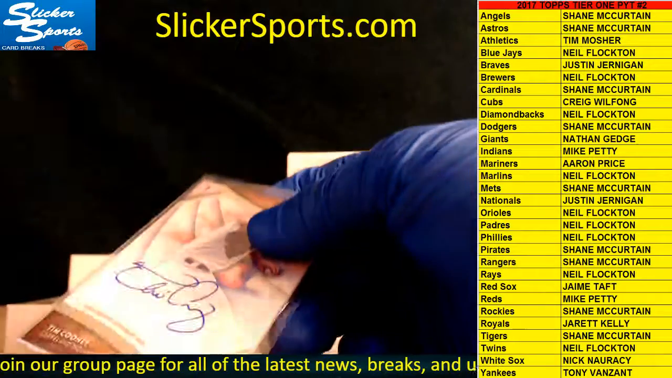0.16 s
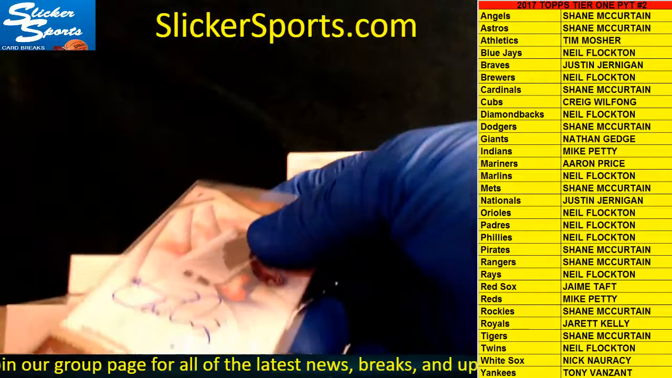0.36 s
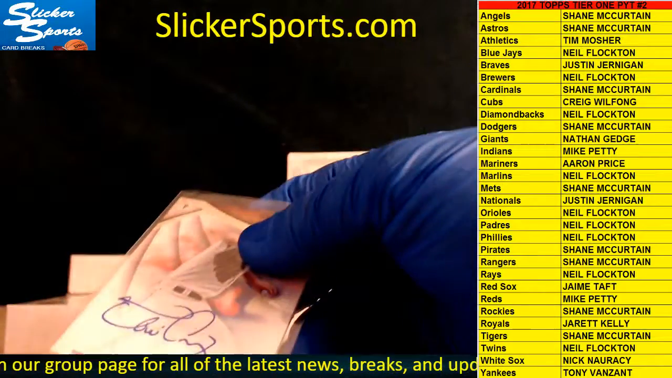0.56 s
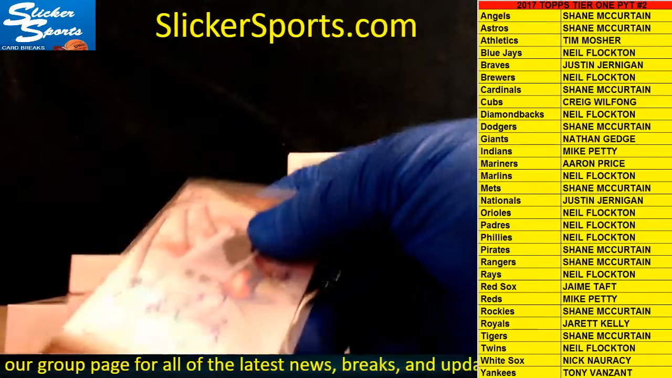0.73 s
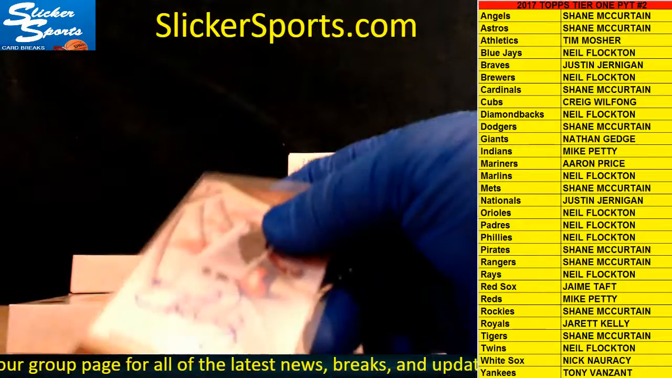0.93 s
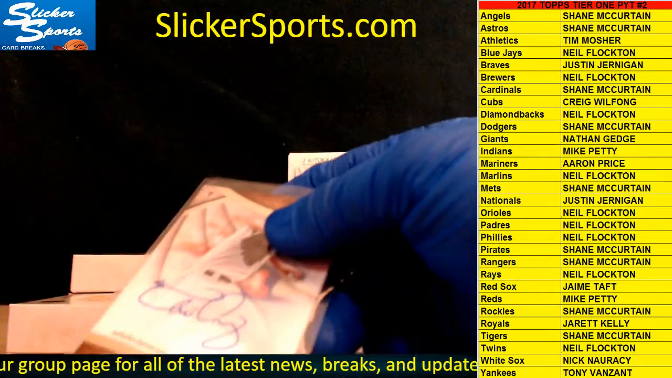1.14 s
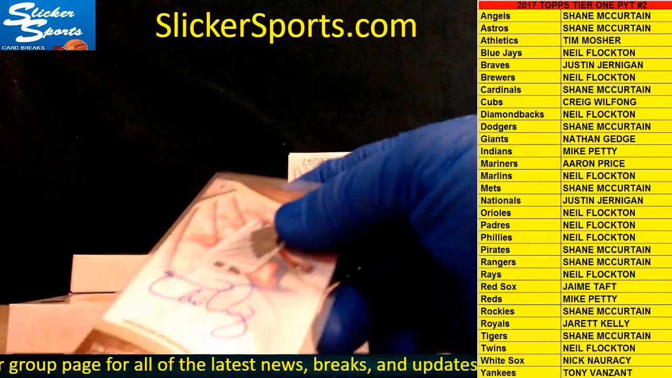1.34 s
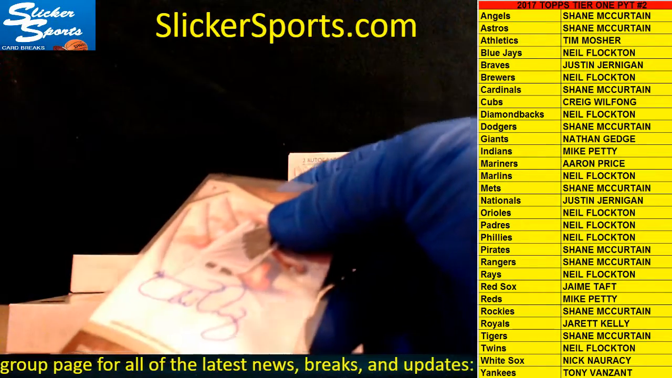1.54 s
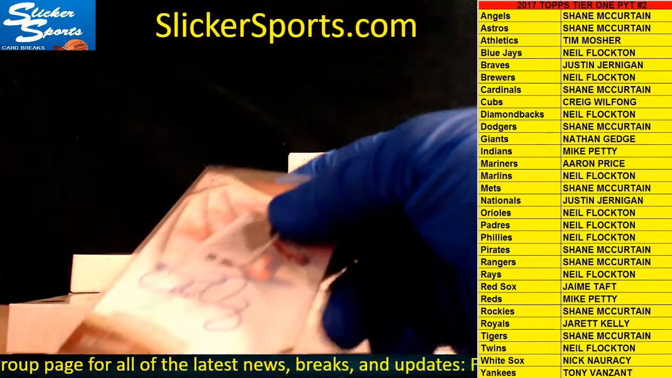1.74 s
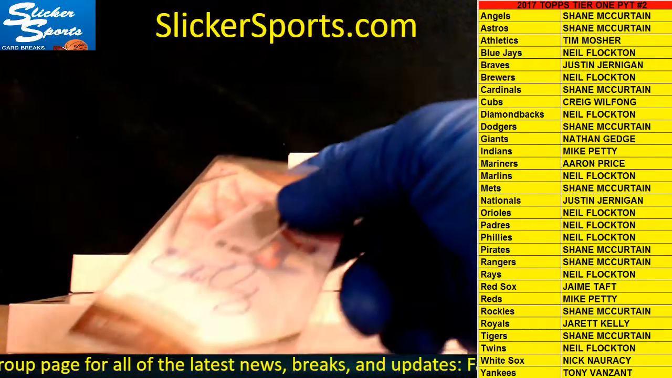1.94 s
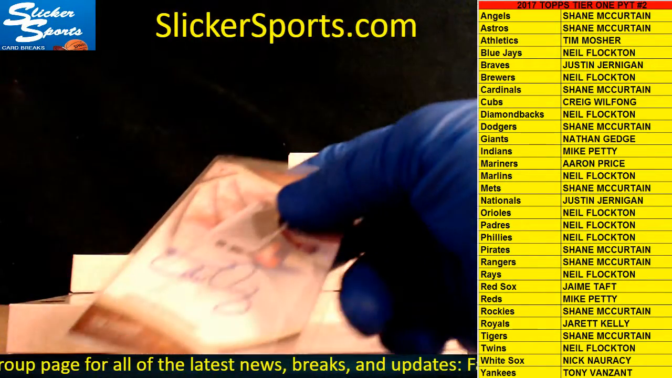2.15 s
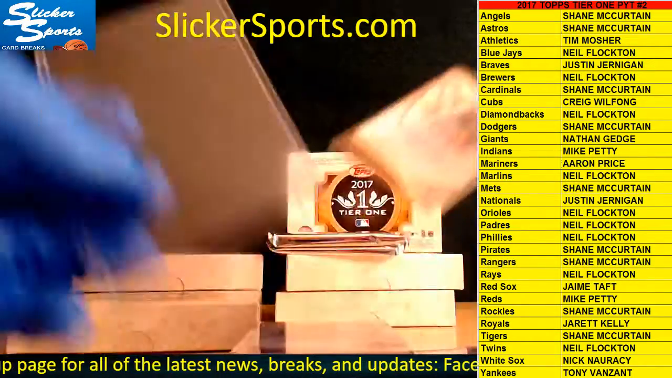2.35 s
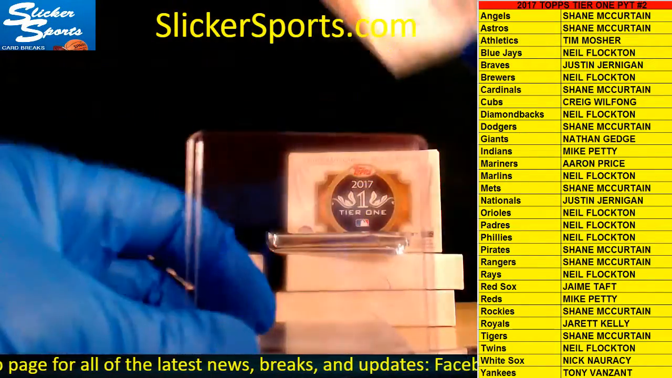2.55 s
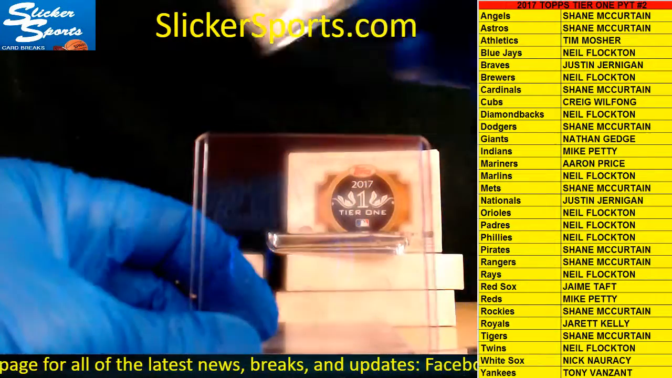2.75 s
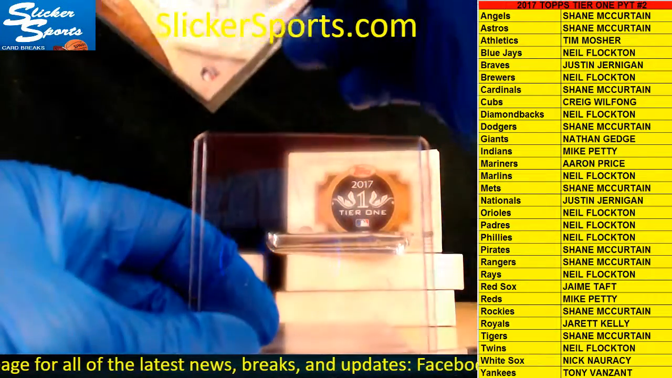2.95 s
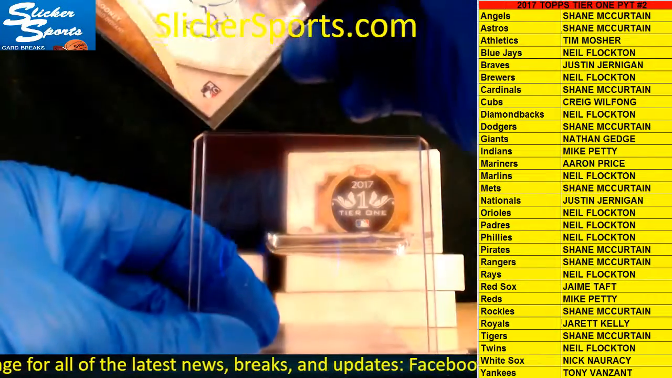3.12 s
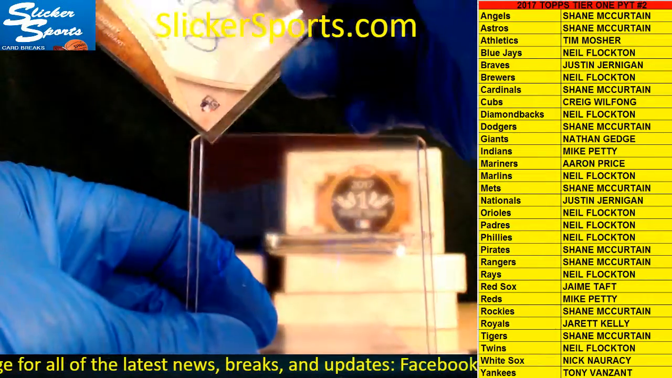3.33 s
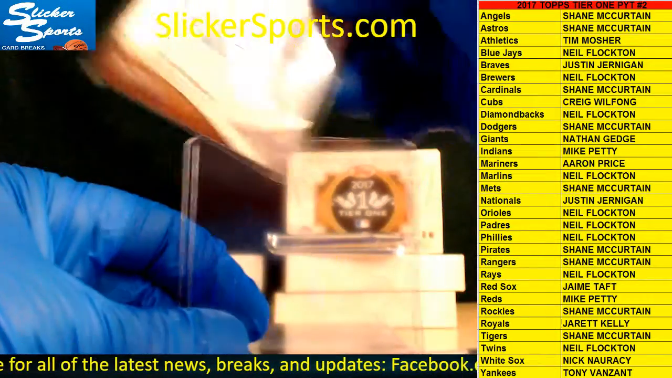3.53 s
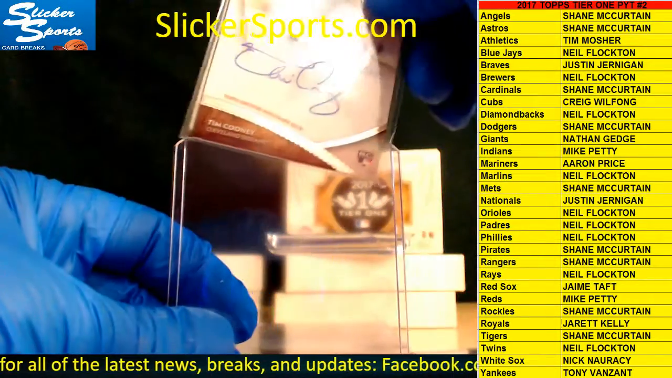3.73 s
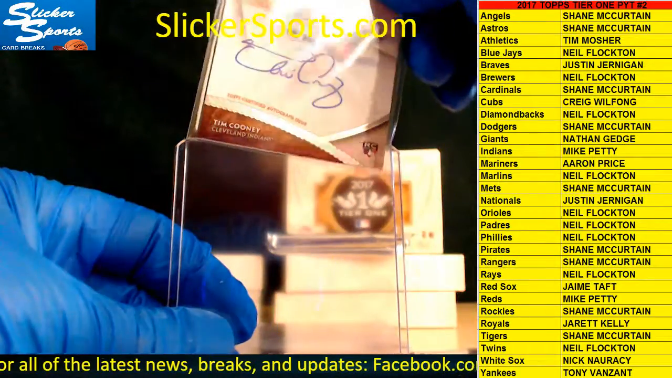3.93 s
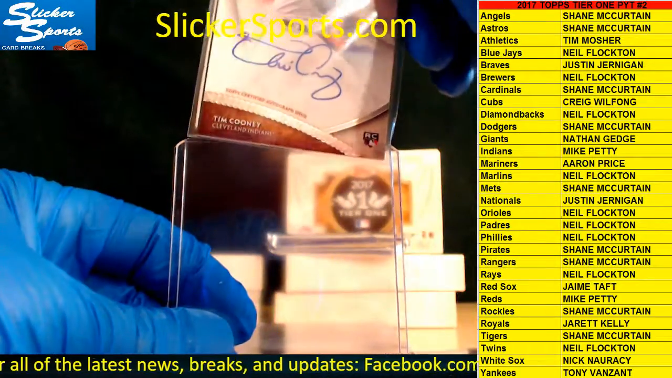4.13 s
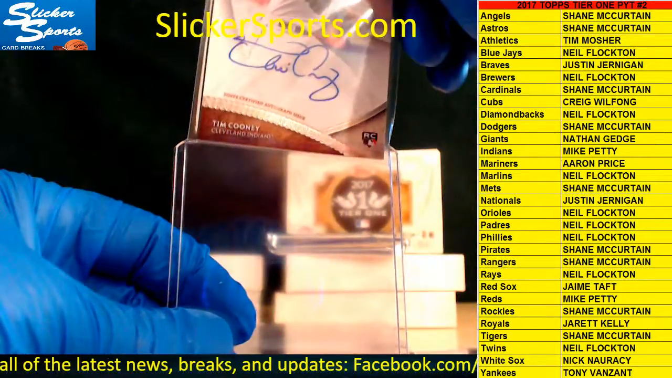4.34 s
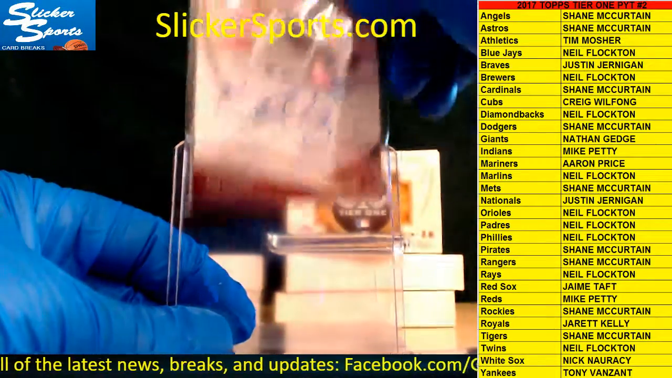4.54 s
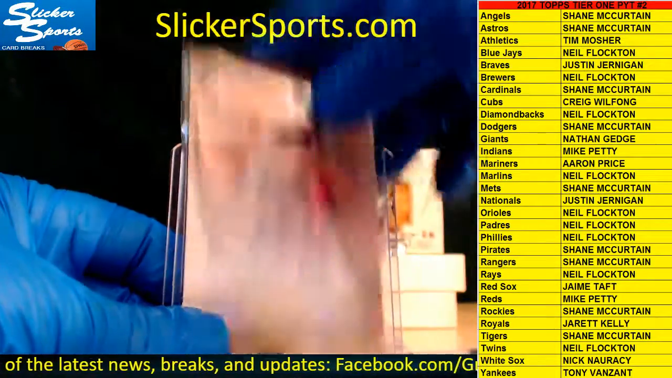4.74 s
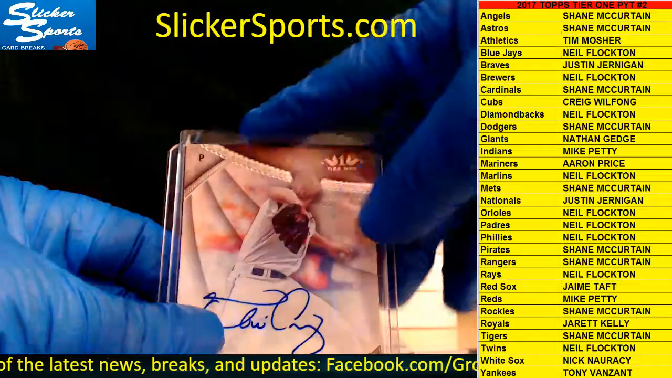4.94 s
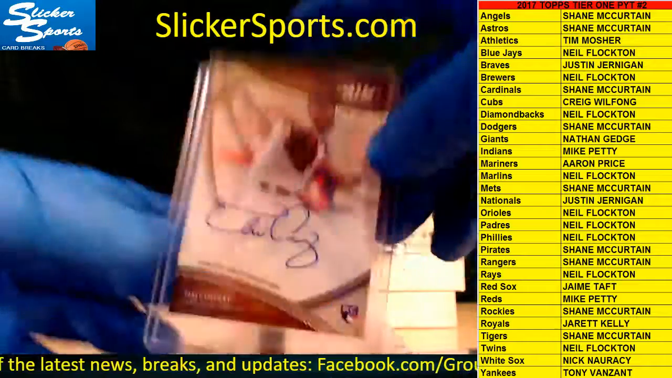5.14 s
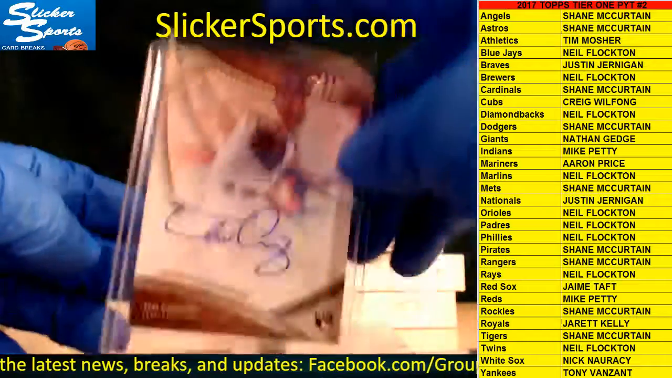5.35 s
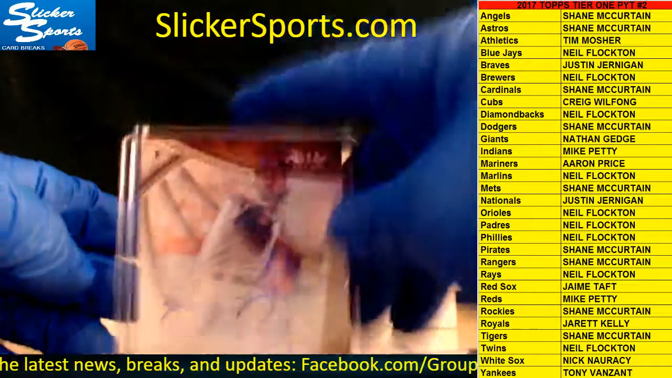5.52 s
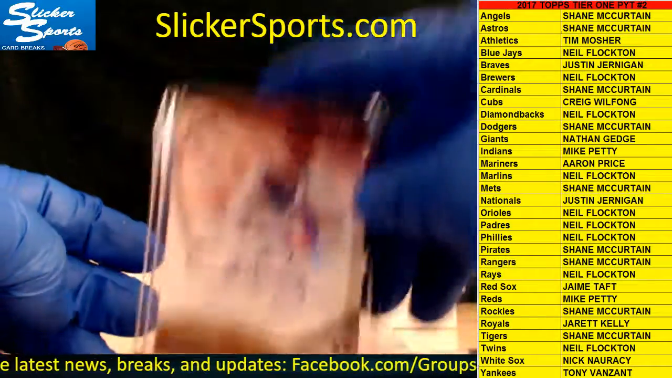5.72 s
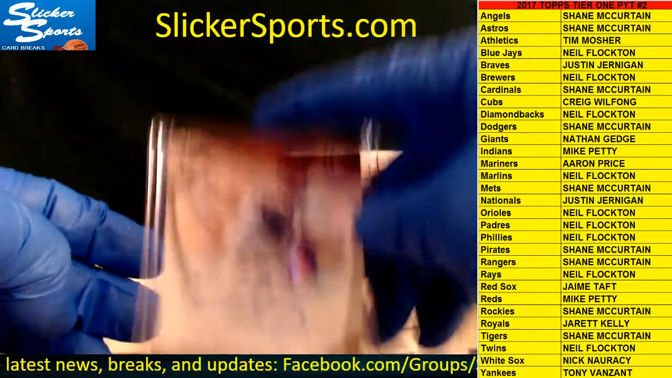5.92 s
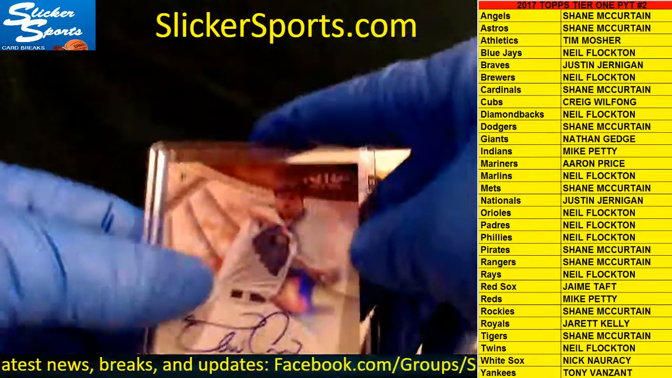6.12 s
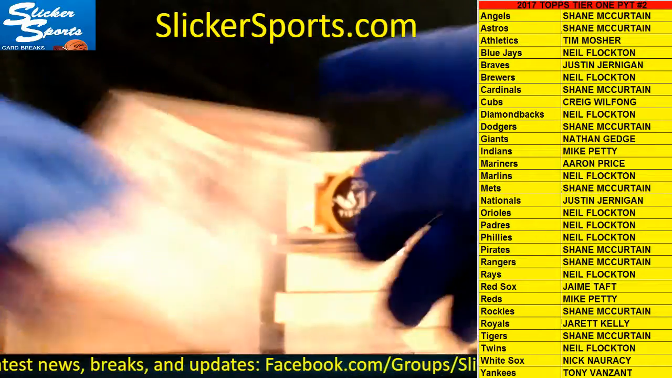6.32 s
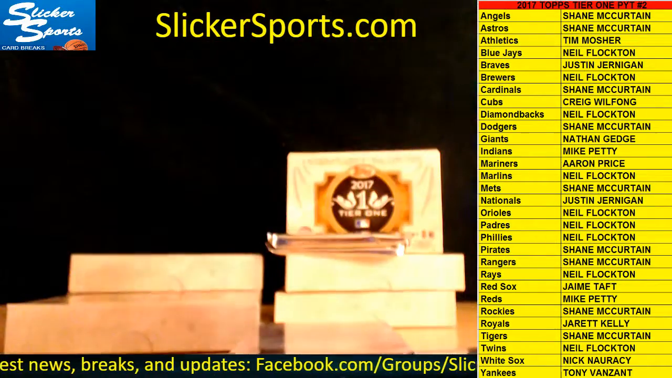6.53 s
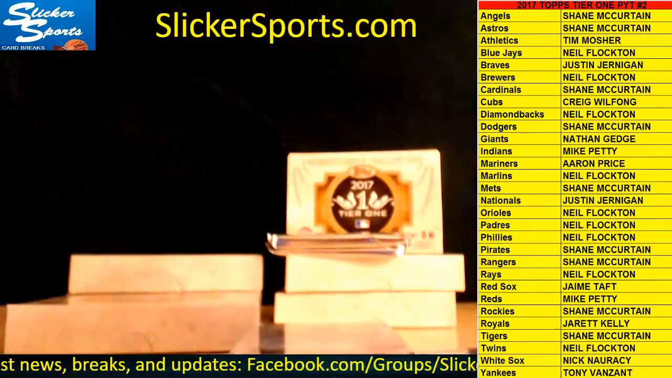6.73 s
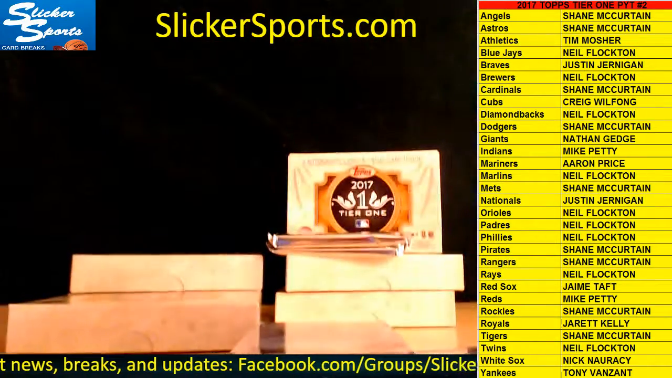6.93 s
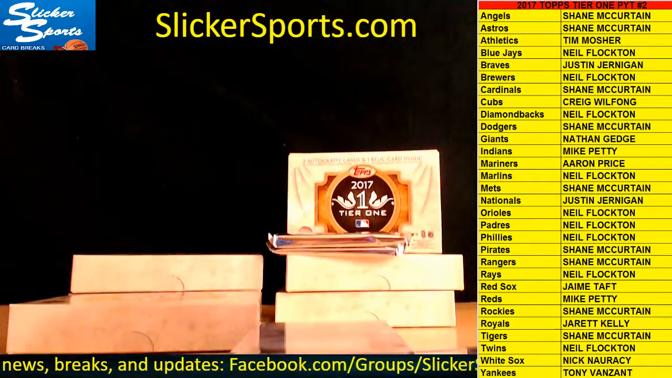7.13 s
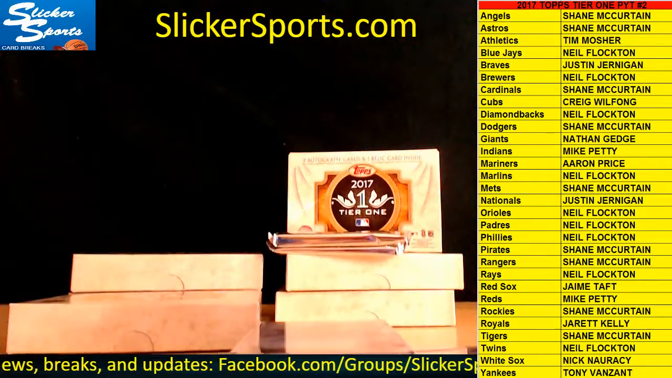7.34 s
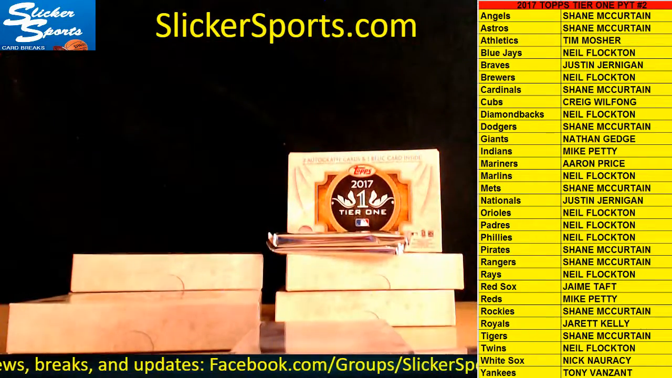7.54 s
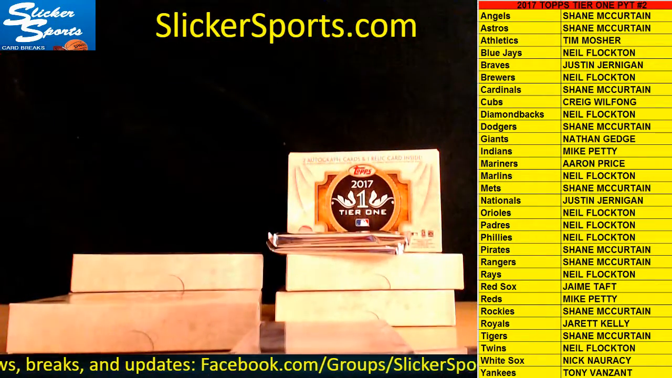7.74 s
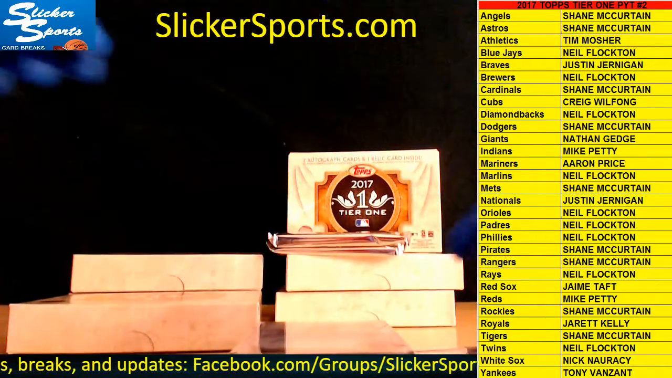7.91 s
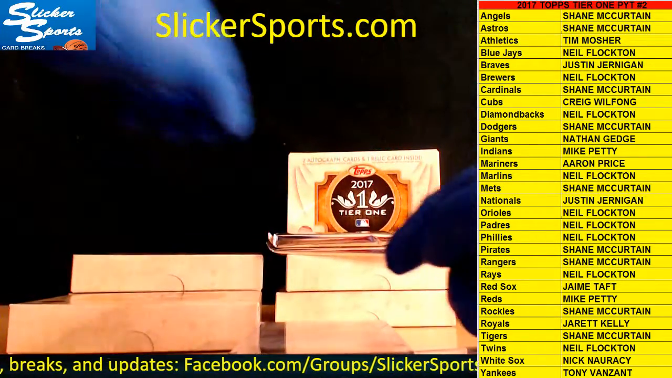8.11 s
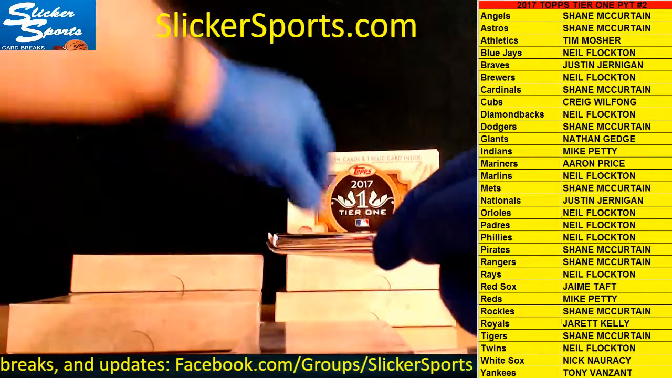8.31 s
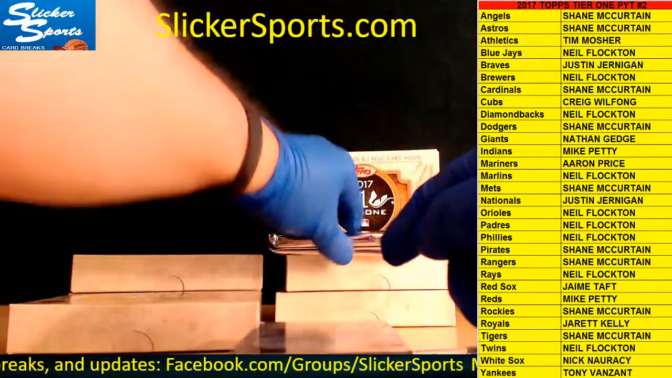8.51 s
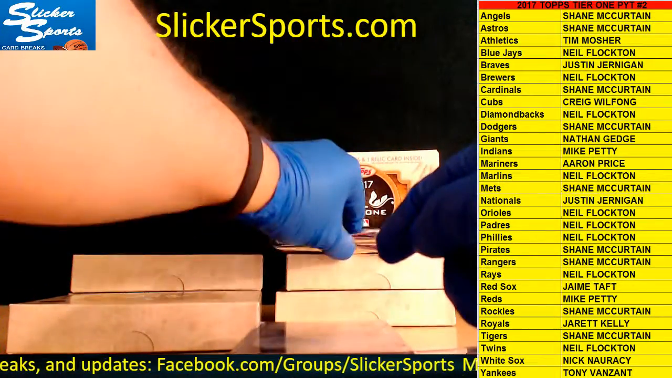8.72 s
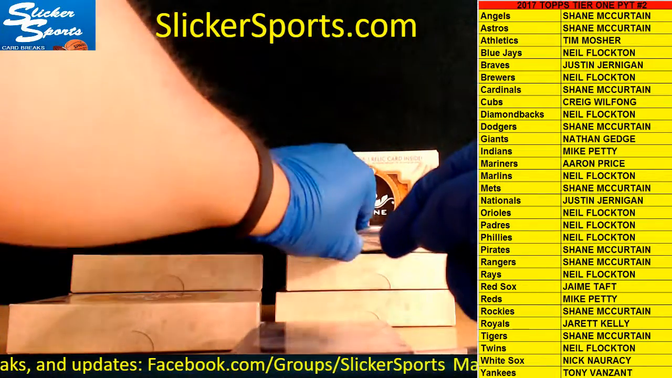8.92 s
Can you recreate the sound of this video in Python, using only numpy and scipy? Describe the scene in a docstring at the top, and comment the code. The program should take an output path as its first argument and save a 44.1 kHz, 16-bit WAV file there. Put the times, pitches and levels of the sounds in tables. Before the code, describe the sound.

A thin card in a soft sleeve rustles faintly, then a rigid plastic holder knocks, takes five sharp taps and clacks down over a faint hum.

```python
"""Card and rigid holder at a desk

Gloved hands slide a sleeved card into a rigid plastic holder at a desk, close to a microphone.
The holder knocks and bounces when picked up, is tapped five times to settle the card, and clacks when set down:
each impact is a short pulse convolved with ringing modes, a desk reflection and a small dry room.
Sleeve and gloves rustle faintly as filtered random slips; a fan hums throughout as sines over shaped noise."""
import sys
import numpy as np
from scipy import signal
from scipy.fft import rfft, irfft, next_fast_len
from scipy.io import wavfile
from scipy.ndimage import map_coordinates

SR = 44100
rng = np.random.default_rng(int(sys.argv[2]) if len(sys.argv) > 2 else 0)


def generate_wav(sig):
    """Save sig (samples, or channels by samples) to the path in sys.argv[1] as 16-bit PCM at SR."""
    pcm = np.round(np.clip(np.atleast_2d(sig).T, -1, 1) * 32767).astype(np.int16)
    wavfile.write(sys.argv[1], SR, pcm)


N = 399987

# reverberation time of the small room: frequency_hz, t60_s
ROOM_DECAY = [(150, .3), (530, 0.23), (1400, 0.26), (2600, .23), (4000, 0.2), (7000, 0.22), (14000, 0.18)]


def taps():
    """Impulse response: each tap arrives directly and off the desk, with chatter, ringing and reverberation."""
    # the holder's edge tapped to settle the card: start_s, direct_peak_db, treble_db_per_octave,
    # desk_delay_s, desk_db (over the direct pulse), ring_db (gain of chatter, modes and room together)
    tap_events = [(5.0845, -22.5, -2, 0.0024, 5, 2), (5.2977, -19, -1.5, .0026, 0.5, 1),
                  (5.489, -18.5, 0.5, 0.0025, 5, 1.5), (5.6806, -19, -2.5, .0025, 3.5, 0.5),
                  (5.8535, -21, 0.5, 0.0033, 6, 3.5)]
    # spectrum of one tap: frequency_hz, level_db (relative)
    knock_spectrum = [(100, -18), (200, -22.5), (300, -8.5), (500, -5), (850, -5.5), (1200, 0.5),
                      (1700, -0.5), (2750, 0), (3500, -5.5), (4800, -24), (6500, -22.5), (9000, -27),
                      (15500, -32)]
    track = np.zeros(N)
    for start, peak_db, treble_db, desk_delay, desk_db, ring_db in tap_events:
        # the card chatters against the holder
        chatter = amp(1.5) * diffuse_tail([(1000, 0.03)], delay=0.0027)
        chatter += amp(-8) * diffuse_tail([(1000, 0.015)], delay=0.0005)
        modes = amp(1.3) * ringing(scatter_db=2.0)
        room = amp(1.4) * diffuse_tail(ROOM_DECAY, delay=0.006)
        path = amp(ring_db) * (chatter + modes + room)
        path[0] += 1  # direct sound
        path[round(abs(desk_delay) * SR)] += amp(desk_db)
        tap = signal.fftconvolve(pulse(knock_spectrum, treble_db, 0), path)
        add(track, start, amp(peak_db) * tap)
    return track


def handling():
    """Impact excitation: the holder is picked up and set down, with light ticks as the card is worked in."""
    # All three event tables: start_s, direct_peak_db, treble_db_per_octave, bass_db (shelf below about 900 Hz)
    # the empty holder knocks and bounces as it is picked up
    pickup_events = [(2.4010, -20.5, 0, -2), (2.4132, -25.5, 0, 8)]
    # the filled holder is set down
    clack_events = [(6.6621, -19.5, -0.5, -1)]
    # light contacts of card, sleeve and holder
    tick_events = [(.7912, -55.5, -2, 7), (.980, -48.5, -4, 13), (1.187, -54, -4, 27),
                   (3.5645, -44.5, 13, 2), (3.6016, -48, -41, 4), (3.7972, -62, -24, 17),
                   (4.4825, -53, 0, 0), (4.625, -44, 8, -1), (4.838, -54.5, -11, 15.5),
                   (6.5595, -42.5, 0, -1), (6.639, -41, 4, -8), (8.416, -64, 2, 0), (8.617, -61, 1, 0),
                   (8.653, -64, 0, -2), (8.877, -55, 6, -4), (8.9412, -42.5, 5.5, -13),
                   (9.0062, -42.5, 6.5, -21)]
    # pulse spectra of the pickup, the clack and the ticks: frequency_hz, level_db (relative)
    hollow_spectrum = [(200, -18.5), (400, -10), (640, -4.5), (800, -9), (1150, -1.5), (2700, -1),
                       (3800, -11), (4900, -25), (5800, -16), (6900, -20), (8100, -32), (8800, -21),
                       (10200, -32), (14000, -37.5)]
    click_spectrum = [(150, -8), (350, -2), (750, -1.5), (1100, 0.5), (1600, -6.5), (2400, 1.5),
                      (2850, -8.5), (3800, -0.5), (4600, -13), (5700, -12.5), (6300, -6.5), (8400, -12),
                      (9500, -12), (15500, -20)]
    thin_spectrum = [(200, -15), (550, -6), (900, -3), (1400, -1), (1850, 0), (2150, -2), (2600, 0.5),
                     (3300, -4), (4700, -8.5), (6000, -7.5), (7500, -11), (10000, -17), (15500, -29)]
    pickup = contacts(pickup_events, hollow_spectrum, ring_t60=0.061, ring_db=0.5, modes_db=-3.0,
                      desk_delay=0.0029, desk_db=-7.0, room_db=-0.7)
    clack = contacts(clack_events, click_spectrum, ring_t60=0.02, ring_db=3.5, modes_db=-17,
                     desk_delay=0.0007, desk_db=-6.0, room_db=-2.5)
    light = contacts(tick_events, thin_spectrum, ring_t60=0.029, ring_db=1.0, modes_db=-8.5,
                     desk_delay=0.0016, desk_db=-22, room_db=-1.5)
    return pickup + clack + light


def contacts(events, spectrum, ring_t60, ring_db, modes_db, desk_delay, desk_db, room_db):
    """Superposition: a plastic contact sums its pulse, dense ring, modes, desk reflection and room."""
    track = np.zeros(N)
    for start, peak_db, treble_db, bass_db in events:
        path = amp(ring_db) * diffuse_tail([(1000, ring_t60)], delay=0.0006)
        path += amp(modes_db) * ringing(scatter_db=2.5)
        path += amp(room_db) * diffuse_tail(ROOM_DECAY, delay=0.005)
        path[0] += 1  # direct sound
        path[round(abs(desk_delay) * SR)] += amp(desk_db)
        contact = signal.fftconvolve(pulse(spectrum, treble_db, bass_db), path)
        add(track, start, amp(peak_db) * contact)
    return track


def ringing(scatter_db):
    """Modal synthesis: exponentially damped sines, which every contact excites a little differently."""
    # modes of the holder: frequency_hz, level_db (relative), t60_s
    holder_modes = [(142, 19, .4), (378, 9, .2), (452, 16, .2), (494, 13, .2), (641, 12, .22),
                    (806, 13, .2), (1035, 10, .14), (1080, 11, .17), (1152, 13, .18), (1182, 9, .28),
                    (1322, 10, .18), (1470, 7, .3), (1512, 10, .15), (1545, 13, .16), (1610, 9, .15),
                    (1658, 14, .16), (1798, 9, .18), (1965, 6, .16), (2066, 8, .13), (2264, 11, .31),
                    (2305, 11, .15), (2362, 12, .2), (2530, 8, .15), (2730, 10, .12), (2795, 12, .16),
                    (2850, 10, .13), (2903, 13, .14), (3279, 10, .15), (3610, 9, .13), (6370, 12, .18)]
    t = np.arange(SR // 2) / SR
    hz, level_db, t60 = np.transpose(holder_modes)[:, :, None]
    decay = np.log(1000) / t60  # per second: 60 dB down after t60
    scattered_db = level_db + scatter_db * rng.standard_normal(hz.shape)
    size = amp(scattered_db) * 2 * decay / SR  # slower decay starts softer
    sines = np.sin(2 * np.pi * (hz * t + rng.random(hz.shape)))
    return np.sum(size * np.exp(-decay * t) * sines, axis=0)


def pulse(spectrum, treble_db, bass_db, size=2048):
    """Minimum phase: a contact's causal pulse, peak 1; harder contacts have more treble."""
    hz = np.fft.rfftfreq(size, 1 / SR)
    treble_tilt = treble_db * np.log2(1 + (hz / 4000) ** 4) / 4  # dB per octave well above 4 kHz
    bass_shelf = bass_db / (1 + (hz / 900) ** 4)
    db = along(spectrum, hz) + treble_tilt + bass_shelf
    # folding the cepstrum onto positive time makes the pulse causal
    cepstrum = irfft(np.log(amp(db)))
    cepstrum[1:size // 2] *= 2
    cepstrum[size // 2 + 1:] = 0
    wave = irfft(np.exp(rfft(cepstrum)))
    return wave / np.abs(wave).max()


def diffuse_tail(t60, delay):
    """Diffuse decay: noise of energy 1 starts after a delay and dies by (frequency_hz, t60_s) points."""
    hz, t, z = signal.stft(rng.standard_normal(SR // 2), SR, nperseg=128)
    decay = amp(-60 * t / along(t60, hz)[:, None])
    tail = signal.istft(z * decay, SR, nperseg=128)[1]
    tail = np.pad(tail, (round(abs(delay) * SR), 0))[:SR // 2]
    return tail / np.linalg.norm(tail)


def slide():
    """Cavity resonance: the sleeve hisses into the holder, whose narrow pocket resonates."""
    # one row a push: start_s, length_s, cavity_db, hiss_db (levels relative)
    pushes = [(3.35, 0.1, -101, -85), (4.42, 0.2, -73.5, -72.5), (6.1, 0.022, -85, -84),
              (6.215, .04, -83.5, -81)]
    # filters of pocket and hiss: frequency_hz, gain_db (relative)
    cavity_spectrum = [(400, -28.5), (750, -9.5), (1020, -5.5), (1170, 1), (1330, -6.5), (1550, -3.5),
                       (1750, -16.5), (4000, -19), (15000, -61)]
    slick_spectrum = [(1000, -14), (2000, 0.5), (4000, 1), (6000, 0), (8000, 1.5), (10500, -0.5),
                      (12500, 2), (15500, -0.5)]
    cavity = amp(0.5) * coloured(slips(rate=600, spread_db=1, smooth_db=-3.5), cavity_spectrum)
    hiss = amp(2.5) * coloured(slips(rate=1600, spread_db=3.5, smooth_db=-1), slick_spectrum)
    # dB per second: a push gets going, grows louder as it gathers speed and stops
    return friction(pushes, cavity, hiss, rise=169.5, drift=30.5, fall=283)


def rustle():
    """Stick-slip friction: gloves catch and slip on the soft sleeve."""
    # one row a stroke: start_s, length_s, rub_db, hiss_db (levels relative)
    strokes = [(.05, 0.49, -89.5, -88.5), (.56, 0.31, -86, -89.5), (.795, 0.082, -73, -83.5),
               (.968, 0.027, -67.5, -80.5), (1.19, 0.075, -69.5, -83), (1.68, 0.18, -74.5, -84),
               (1.93, 0.15, -80, -85.5), (2.11, 0.3, -82, -90.5), (4.79, 0.092, -78.5, -89),
               (6.56, .09, -72.5, -79), (7.75, .65, -95, -96.5), (8.51, 0.2, -90.5, -91.5),
               (8.87, 0.21, -87.5, -85.5)]
    # filters of rubbing and hiss: frequency_hz, gain_db (relative)
    rub_spectrum = [(200, -5.5), (400, -7), (510, 4.5), (750, -2), (1000, 2.5), (1320, -2), (1800, -5.5),
                    (2450, -4), (4000, -14), (7000, -22), (15000, -27.5)]
    hiss_spectrum = [(1500, -33), (3500, 3.5), (5000, -0.5), (7000, 1.5), (10000, -5), (15500, -14)]
    rub = amp(-1.05) * coloured(slips(rate=260, spread_db=0, smooth_db=-5), rub_spectrum)
    hiss = amp(-0.7) * coloured(slips(rate=700, spread_db=3.5, smooth_db=-1), hiss_spectrum)
    catch_db, catches_per_s = 2.5, 50  # the glove catches unevenly
    catching = amp(catch_db * wobble(catches_per_s))
    # dB per second: a stroke grips quickly, eases while it lasts and lets go
    return catching * friction(strokes, rub, hiss, rise=700, drift=-3.5, fall=259)


def friction(moves, body, hiss, rise, drift, fall):
    """Amplitude modulation: a body sound and a hiss swell and fade together with each movement."""
    track = np.zeros(N)
    for start, length, body_db, hiss_db in moves:
        rubbing = amp(body_db) * body + amp(hiss_db) * hiss
        track += gesture(start, length, rise, drift, fall) * rubbing
    return track


def slips(rate, spread_db, smooth_db):
    """Granular friction: sparse slips of uneven size over a smooth rush, heard with the room."""
    slipping = rng.random(N) < rate / SR  # rate is slips per second
    unevenness = amp(spread_db * np.clip(rng.standard_normal(N), -2, 2))
    grains = slipping * rng.standard_normal(N) * unevenness
    rush = unit(grains) + amp(smooth_db) * rng.standard_normal(N)
    room = signal.fftconvolve(rush, diffuse_tail(ROOM_DECAY, delay=0.0028))[:N]
    return rush + amp(-2.5) * room


def gesture(start, length, rise, drift, fall):
    """Exponential envelope: attack up to start, sloping hold and release, with slopes in dB per second."""
    t = np.arange(N) / SR - start
    attack = rise * np.minimum(t, 0)
    hold = drift * (np.clip(t, 0, length) - length / 2)
    release = fall * np.maximum(t - length, 0)
    return amp(np.maximum(attack + hold - release, -200))


def fan():
    """Tonal and broadband noise: phase-wandering hum lines over a soft rush of air."""
    # lines of the fan and the mains: frequency_hz, peak_db
    hum_lines = [(28.5, -74.5), (56, -75.5), (59.5, -73.5), (90, -63), (112, -84.5), (143, -82.5),
                 (236, -83), (294, -81.5), (356, -81), (415, -89), (478, -89)]
    # filter of the air rush: frequency_hz, gain_db (relative)
    air_spectrum = [(20, -8), (45, -1), (75, -7), (130, -1.5), (170, -14), (220, -7.5), (265, -14),
                    (420, -13), (600, -25), (1000, -27.5), (2000, -34.5), (5000, -43), (10000, -46.5),
                    (15500, -46)]
    t = np.arange(N) / SR
    hum = np.zeros(N)
    for hz, peak_db in hum_lines:
        wander = hz / 300 * wobble(2.4)  # radians
        hum += amp(peak_db) * np.sin(2 * np.pi * (hz * t + rng.random()) + wander)
    return hum + amp(-70.0) * coloured(rng.standard_normal(N), air_spectrum)


def amp(db):
    """Logarithmic level: decibels to amplitude gain."""
    return 10 ** (np.asarray(db) / 20)


def unit(x):
    """Root mean square: scale to rms 1."""
    return x / np.sqrt(np.mean(x ** 2) + 1e-20)


def along(points, hz):
    """Logarithmic frequency: (frequency_hz, value) points interpolated on a log axis."""
    f, v = np.transpose(points)
    return np.interp(np.log(hz + 1), np.log(f + 1), v)


def wobble(rate):
    """Band-limited randomness: a smooth curve through rate random knots a second."""
    knots = rng.standard_normal(int(N * rate / SR) + 4)
    return map_coordinates(knots, [np.arange(N) * rate / SR])


def filtered(x, response):
    """Linear filtering: multiply the spectrum of x by a function of frequency."""
    m = next_fast_len(len(x) + SR // 4)
    return irfft(rfft(x, m) * response(np.fft.rfftfreq(m, 1 / SR)), m)[:len(x)]


def coloured(x, spectrum):
    """Spectral shaping: x filtered by (frequency_hz, gain_db) points, at rms 1."""
    return unit(filtered(x, lambda hz: amp(along(spectrum, hz))))


def add(track, start, sound):
    """Superposition: mix a sound into the track at start seconds."""
    part = track[round(start * SR):][:len(sound)]
    part += sound[:len(part)]


def scene():
    """Superposition: every source adds at the one microphone."""
    return (taps() + handling() + rustle() + slide() + fan())[None]


def record(dry):
    """Band limiting: an elliptic low-pass cuts what lies above the recorder's limit by 70 dB."""
    top_hz = 15900
    band_limit = signal.ellip(10, 0.2, 70, top_hz, fs=SR, output="sos")
    return signal.sosfilt(band_limit, dry)


dry = scene()
out = record(dry)
generate_wav(out)
```